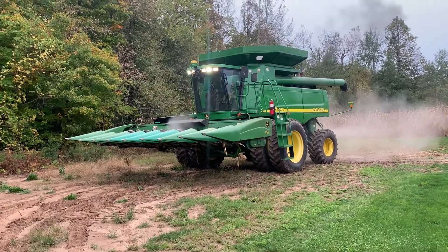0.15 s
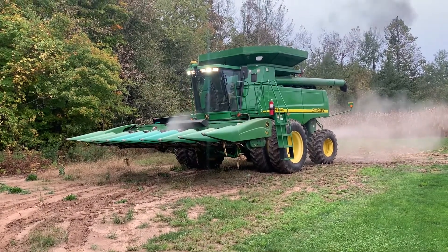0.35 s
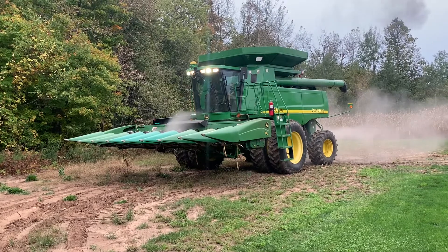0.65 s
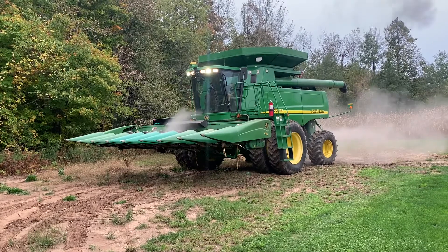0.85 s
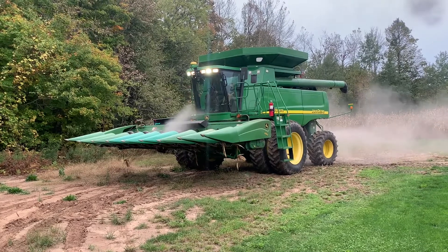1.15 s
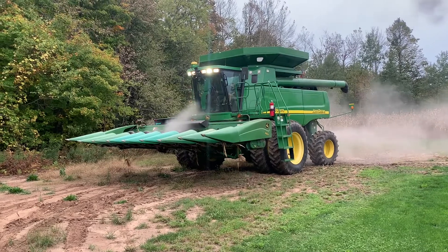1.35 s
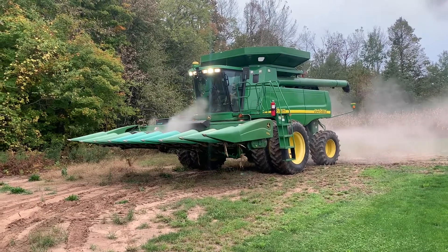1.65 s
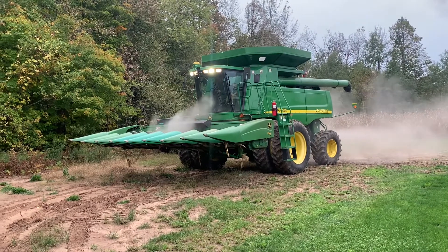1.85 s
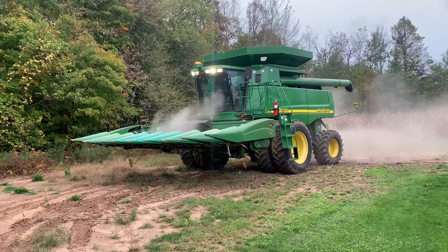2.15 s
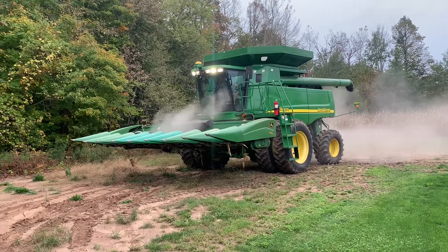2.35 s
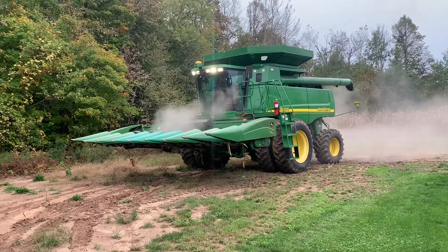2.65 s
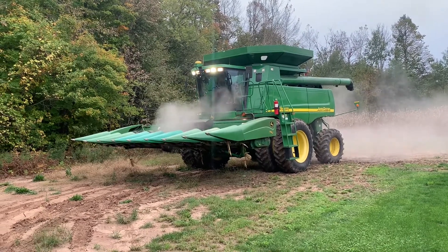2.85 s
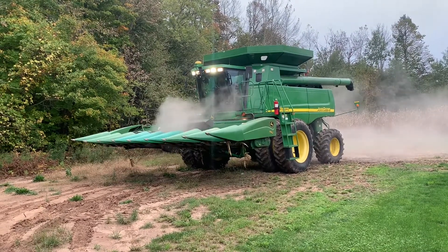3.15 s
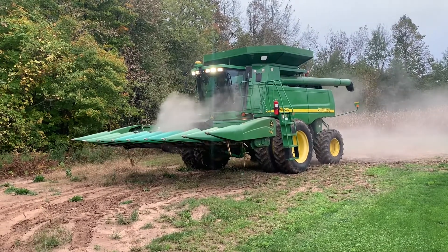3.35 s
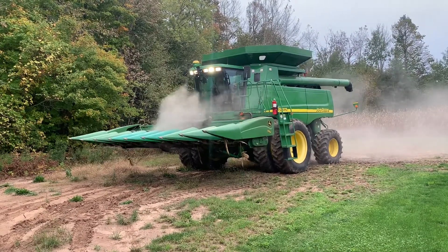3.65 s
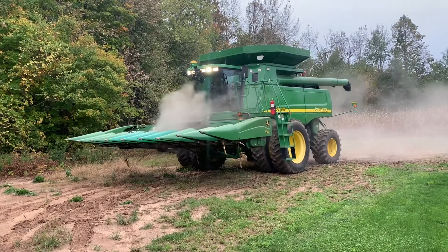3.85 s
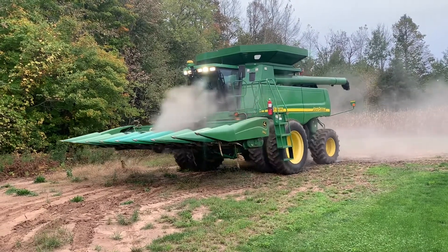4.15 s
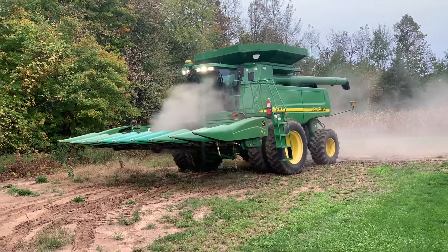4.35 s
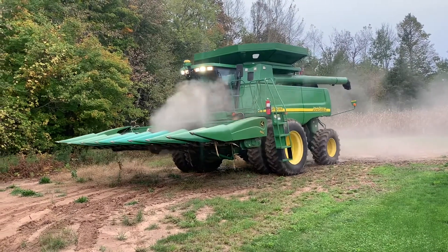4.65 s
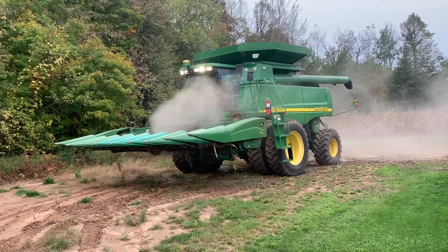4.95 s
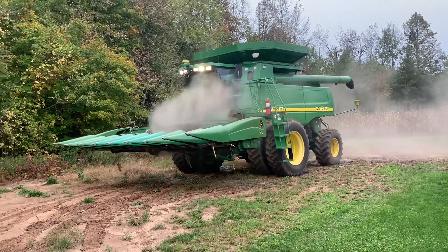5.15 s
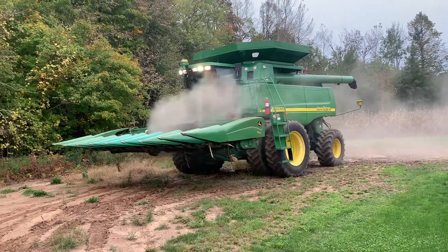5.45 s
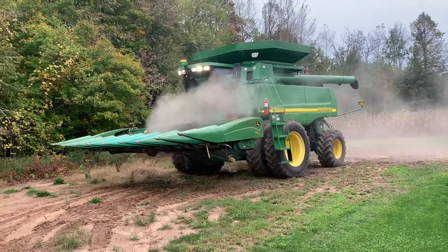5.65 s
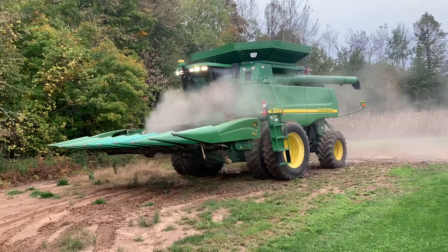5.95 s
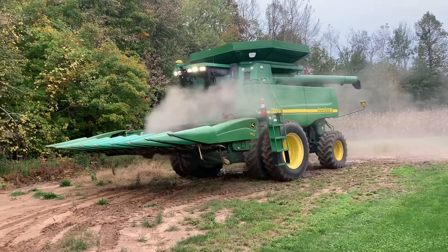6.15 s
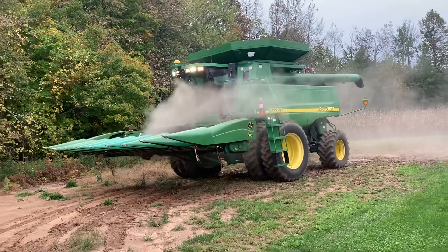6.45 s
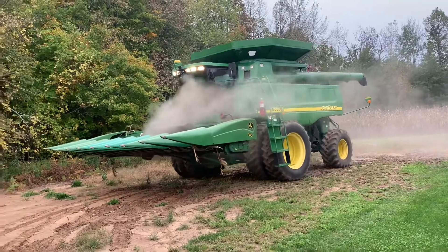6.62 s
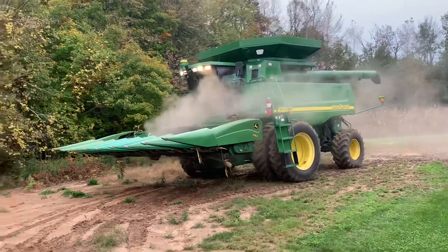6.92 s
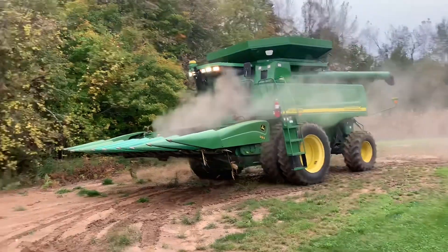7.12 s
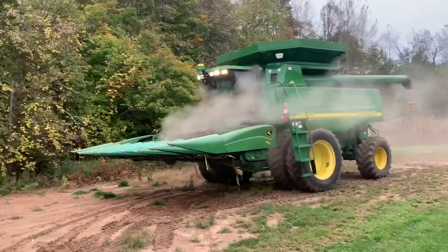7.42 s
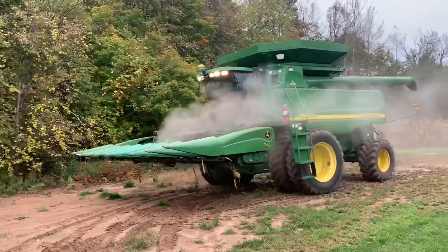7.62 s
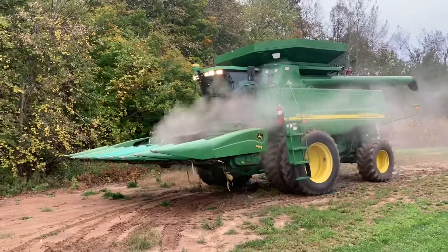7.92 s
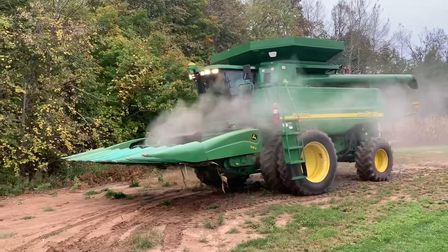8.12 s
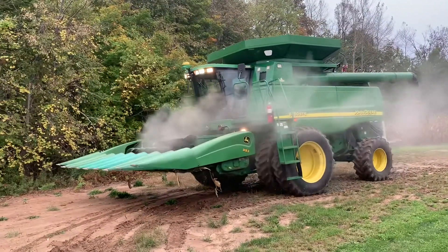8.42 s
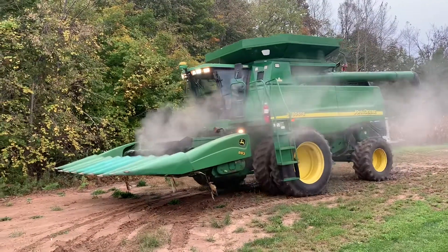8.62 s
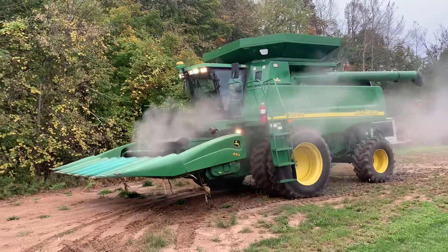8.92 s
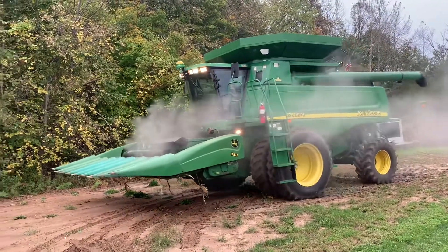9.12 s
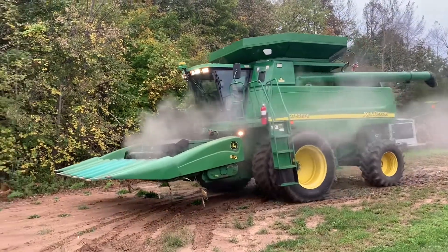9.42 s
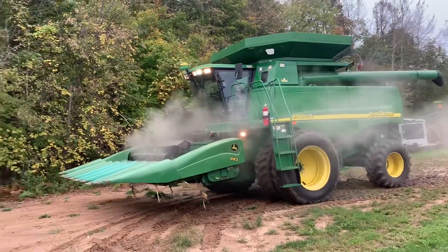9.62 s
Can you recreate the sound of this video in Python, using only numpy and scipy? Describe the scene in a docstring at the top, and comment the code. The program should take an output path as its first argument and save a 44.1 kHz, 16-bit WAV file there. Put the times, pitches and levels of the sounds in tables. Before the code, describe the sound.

A combine harvester's diesel engine hums under roaring fans, a belt squeals briefly, then dry chains hiss and chirp while bearings squeak.

```python
"""A steady diesel hum under a roar of fans: a combine harvester creeps past, its six-cylinder engine
turning a rotor and whining gears while the turbo whistles and loose guards rattle. After a second and
a half the header engages: a slipping belt squeals, the engine sags for a moment, and dry gathering
chains hiss and chirp on sheet steel. Later, dry bearings stick and slip in squeaks and one long squeal."""
import sys
import numpy as np
from scipy import signal
from scipy.fft import rfft, irfft
from scipy.io import wavfile
from scipy.ndimage import uniform_filter1d, map_coordinates

SR = 44100
rng = np.random.default_rng(int(sys.argv[2]) if len(sys.argv) > 2 else 0)


def inscribe(sig):
    """Save sig as 16-bit PCM at rate SR to the path in sys.argv[1].

    A 1-D sig is mono; a 2-D sig holds one channel per row.
    Samples are clipped to [-1, 1] before scaling.
    """
    pcm = np.round(np.clip(np.atleast_2d(sig).T, -1, 1) * 32767)
    wavfile.write(sys.argv[1], SR, pcm.astype(np.int16))


N = 431298
TIME = np.arange(N) / SR

# governed firing rate, sagging as the clutch slips: t/s, f/Hz
FIRING_RATE = [(0, 106.1), (1.15, 105.7), (1.65, 103.8), (2, 105.7), (3.7, 105.2), (5, 105.7), (7.7, 105.7),
               (8.3, 104.7), (9.78, 105.6)]
# octave above the firing note: t/s, level/dB
OCTAVE_ENVELOPE = [(0, -25), (1.7, -26), (4, -28.5), (6, -36), (9.1, -32), (9.7, -25.5)]
# engine shafts, then header shafts: multiple of the firing rate, level/dB
ENGINE_PARTIALS = [(1.52, -34.5), (2.595, -33.5), (5.92, -43), (11.08, -42), (11.92, -42), (13.69, -44.5)]
HEADER_PARTIALS = [(3.02, -35.5), (3.51, -38), (3.73, -39.5)]
# EQ of the body's rumble and of the roar of fans and sieves: f/Hz, relative level/dB
RUMBLE_EQ = [(20, -32), (32, -21), (45, -8.5), (58, -1.5), (90, -0.5), (140, -2), (210, 0), (270, -5.5),
             (350, -6), (400, -6.5), (450, -9.5), (510, -20.5), (800, -63)]
ROAR_EQ = [(350, -29), (510, -4.5), (600, 1.5), (670, -0.5), (800, -2.5), (1080, -3.5), (1300, -1.5),
           (1520, 0), (1720, -4.5), (2250, -6), (2650, -8), (3100, -11), (4700, -14.5), (5600, -20.5),
           (9000, -25), (11000, -68)]
# ground reflections: centre t/s, length/s, delay/ms, drift/(ms/s), gain
GROUND_BOUNCES = [(.2, 2.4, 1.67, -.03, .17), (.7, 2.8, 1.49, 0, .14), (1.65, .8, 2.34, 0, .15),
                  (9, 4, 1.22, 0, .11), (9.4, 1.8, 2.48, .11, .17), (9.4, 2.2, 3.02, .13, .16)]
# rotor overtones: multiple of the rotor rate, level/dB
ROTOR_PARTIALS = [(3, -37), (4, -37), (7, -41)]
# swells of gear whine: centre t/s, length/s, boost/dB, mesh
GEAR_WHINES = [(3.6, 1.05, 13.5, "low"), (4.5, 0.44, 13, "high"), (5.6, 2.2, 6.3, "low"),
               (7.1, .6, 12, "high"), (8.85, .9, 11, "low")]
# turbo whistles: start t/s, length/s, starting f/Hz, fall/(Hz/s), level/dB
TURBO_WHISTLES = [(-.2, 1.8, 2570, 4.7, -31.5), (-.2, 1.4, 3050, 3.2, -40), (-.2, 2.5, 4750, 3, -44),
                  (7.892, 2.1, 2850, 23, -33)]
# modes of the loose steel guards: f/Hz, relative level/dB
GUARD_RESONANCES = [(795, -42), (1300, -37.5), (2450, -40), (2660, -40), (3280, -42.5), (4060, -45.5),
                    (4340, -47.5), (5000, -47)]
# belt squeal as it slips, catches and settles: t/s, f/Hz
BELT_GLIDE = [(1.3, 1410), (1.45, 1455), (1.6, 1485), (1.73, 1570), (1.82, 1480), (1.96, 1440), (2.1, 1390)]
# partials of that squeal: multiple of its pitch, level/dB
BELT_HARMONICS = [(1, -25.5), (2, -41)]
# modes of the belt pulley: f/Hz, level/dB
PULLEY_RESONANCES = [(2050, -44), (2580, -41), (3070, -36.5), (3400, -42)]
# EQ of the gritty hiss: f/Hz, relative level/dB
HISS_EQ = [(3000, -11.5), (5000, -11.5), (6300, -5), (7900, -4), (8080, 6), (8550, 2), (9500, -5.5),
           (11000, -5), (13000, -8.5), (14000, -11), (14600, -33)]
# loud chirps of dry links: t/s, peak level/dB, f/Hz
LINK_CHIRPS = [(1.670, -23, 8050), (1.687, -18.5, 8750), (1.983, -23, 8050), (2.200, -22, 8120),
               (2.382, -22, 8760), (2.743, -25, 8300), (2.898, -17.5, 8440), (3.064, -20, 8130),
               (3.087, -26, 6050), (3.181, -18, 8270), (4.442, -23, 8170), (4.461, -17, 8340),
               (4.806, -18, 8620), (5.043, -24, 9990), (5.843, -18, 8600), (6.189, -19, 8000),
               (6.258, -21, 10160), (7.049, -17, 8650), (7.225, -20, 8780), (7.243, -23, 6120),
               (7.583, -23, 9900), (8.606, -18, 8720), (9.117, -23, 10200)]
# bearing squeaks: centre t/s, length/s, f/Hz, level/dB
BEARING_SQUEAKS = [(3.8, 0.13, 3300, -38), (4.1, 0.22, 2870, -39), (4.25, .4, 3280, -41),
                   (4.59, .07, 2650, -34), (5.947, 1.0, 4720, -43.5), (6.25, .6, 4100, -43),
                   (8.482, 0.2, 2850, -38), (9.024, .07, 2820, -30)]
# long bearing squeal: t/s, f/Hz, level/dB
BEARING_SQUEAL = [(5.1, 2850, -80), (5.33, 2850, -37), (5.5, 2870, -37), (5.8, 2770, -38.5),
                  (6.45, 2715, -36.5), (6.75, 2660, -39), (7.3, 2664, -38), (7.9, 2620, -80)]
# grit striking steel: t/s, peak level/dB, f/Hz
GRIT_TICKS = [(8.402, -16.5, 13000)]
# stereo width of the noise: f/Hz, left-right correlation (0-1)
STEREO_CORRELATION = [(100, .997), (400, .988), (850, .77), (1400, .85), (2200, .66), (4000, .55),
                      (8300, .5), (10000, .93)]
# direction of the engine bay: t/s, left delay/samples
LEFT_DELAY = [(0, .5), (5, .5), (7, 1.1), (8.2, 2), (9.78, 3.4)]
# stereo balance: f/Hz, left minus right level/dB
STEREO_BALANCE = [(300, .2), (500, -1), (850, -8.8), (1150, -3), (2100, -.8), (5500, -2.8), (7700, -1.3),
                  (8200, -6), (9800, 0)]
# stereo phase: f/Hz, left lead/rad
STEREO_PHASE = [(40, -.36), (150, -.28), (750, -.6), (1000, .1), (1500, -.45), (4500, .2), (5300, -1.5),
                (7000, 2.3), (8900, 2.4), (9800, 0), (10600, -.2), (11400, -2.9), (12200, -3.3),
                (13100, -6.2), (14000, -6.4)]

# faders: idle level/dB, boost with the header on/dB, boost at full slip/dB, ramp afterwards/(dB/s)
RUMBLE_FADER, ROAR_FADER = (-20, 1, 1.5, 0), (-24.5, 1.84, 2, .07)
ROTOR_FADER, ROTOR_OCTAVE_FADER = (-35.5, 2, 11, 1.0), (-36.5, 7.5, 6, -.5)
RATTLE_FADER, BELT_FADER = (-8.5, 4, 0, .62), (-38, 7, -11, -.68)
HYDRAULIC_FADER, CHAIN_FADER = (-60, 4.5, 0, .8), (-43, 10, 1.5, .04)

CLUTCH_S, SLIP_LENGTH_S, SPIN_UP_S = 1.68, .62, .42  # the header clutch slips hardest at CLUTCH_S
ROTOR_TURNS_PER_FIRING = .5531


def undb(db):
    """Decibels to gain."""
    return 10 ** (np.asarray(db) / 20)


def unit(x):
    """Scale to an rms of 1."""
    return x / np.sqrt(np.mean(x ** 2))


def curve(rows):
    """Automation lane through (t/s, value) points."""
    return np.interp(TIME, *np.transpose(rows))


def per_bin(points):
    """Curve through (f/Hz, value) points, at every Fourier bin."""
    hz, value = np.transpose(points)
    return np.interp(np.log(np.arange(N // 2 + 1) * SR / N + 1), np.log(hz), value)


def colour(x, eq):
    """Apply an EQ curve and normalise to rms 1."""
    return unit(irfft(rfft(x) * undb(per_bin(eq)), N))


def walk(rate_hz):
    """Random LFO: sample-and-hold, smoothed twice; rms 1."""
    hold = max(int(SR / rate_hz), 2)
    steps = np.repeat(rng.standard_normal(N // hold + 1), hold)[:N]
    return unit(uniform_filter1d(uniform_filter1d(steps, hold), hold))


def swell(centre_s, length_s):
    """Bell-shaped envelope peaking at 1."""
    return np.exp(-(2 * (TIME - centre_s) / length_s) ** 2)


def rise(centre_s, length_s):
    """Smooth fade from 0 to 1."""
    return (1 + np.tanh(2 * (TIME - centre_s) / length_s)) / 2


def slip():
    """How hard the header clutch slips, 0-1."""
    return swell(CLUTCH_S, SLIP_LENGTH_S)


def fader_db(fader, strain, bite_s=.11):
    """A layer's level: up as the clutch bites, shifted by the strain, then ramping as the machine rolls."""
    idle_db, running_db, slip_db, db_per_s = fader
    running = rise(CLUTCH_S - bite_s, SPIN_UP_S)
    return idle_db + running_db * running + slip_db * strain + db_per_s * np.maximum(TIME - CLUTCH_S, 0)


def angle(hz):
    """Running phase of something that turns at hz."""
    return 2 * np.pi * np.cumsum(hz) / SR


def warble(depth, rate_hz, rasp=.006):
    """Phase per Hz of a tone with random vibrato and a fine rasp."""
    return angle(1 + depth * walk(rate_hz) + rasp * walk(400))


def tone(phase, db, waver_db):
    """A sine whose level wavers in the moving air."""
    return np.sqrt(2) * undb(db + waver_db * walk(7)) * np.sin(phase + rng.uniform(0, 2 * np.pi))


def whistle(phase, db, width_hz, flutter_db):
    """A hoarse, fluttering band of noise around a running phase."""
    envelope = undb(db + flutter_db * walk(15))
    return envelope * (walk(width_hz) * np.cos(phase) + walk(width_hz) * np.sin(phase))


def wide_noise():
    """Stereo noise of a large machine: near mono in the bass, wider above."""
    mid, side = rfft(rng.standard_normal((2, N)))
    alike = np.clip(per_bin(STEREO_CORRELATION), 0, 1)
    mid, side = mid * np.sqrt((1 + alike) / 2), side * np.sqrt((1 - alike) / 2)
    return irfft(np.array([mid + side, mid - side]), N)


def delayed(x, delay_s):
    """Stereo delay line with a moving delay time."""
    samples = np.arange(N)
    return np.array([np.interp(samples - SR * delay_s, samples, channel) for channel in x])


def mode_pole(hz, t60_s):
    """Pole of a mode that rings down 60 dB in t60_s."""
    return np.exp((2j * np.pi * hz - np.log(1000) / t60_s) / SR)


def engine(firing):
    """Exhaust pulses hum a muffled note over the tones of the shafts and the rumble of the body."""
    shadow_db = 13.5 * swell(7.2, 2.56)  # the body hides the exhaust as it rolls by
    turn_away_db = .66 * TIME  # the pipe turns away
    note = tone(firing, -17 - shadow_db - 1.5 * slip() - turn_away_db, waver_db=1.1)
    octave = tone(2 * firing, curve(OCTAVE_ENVELOPE), waver_db=0)
    shafts = sum(tone(k * firing, db, waver_db=2) for k, db in ENGINE_PARTIALS)
    header = sum(tone(k * firing, db, waver_db=2) for k, db in HEADER_PARTIALS)
    rumble = colour(wide_noise(), RUMBLE_EQ) * undb(fader_db(RUMBLE_FADER, slip()))
    return note + octave + shafts + rise(CLUTCH_S, SPIN_UP_S) * header + rumble


def clatter(firing, loop_size=2500):
    """Injectors and valves loop the same uneven rattle every six firings."""
    position = firing / (2 * np.pi * 6) * loop_size
    loop = rng.standard_normal(loop_size)
    return unit(map_coordinates(loop, [position % loop_size], order=3, mode="grid-wrap"))


def fans(firing):
    """Air roars through the housing, throbbing with each rotor turn, over the diesel's clatter."""
    turn = ROTOR_TURNS_PER_FIRING * firing
    throb = 1 + .055 * np.cos(turn) + .045 * np.cos(2 * turn)
    air = colour(wide_noise() * throb + .3 * clatter(firing), ROAR_EQ)
    return air * undb(fader_db(ROAR_FADER, slip()) + .68 * walk(20))


def ground(x):
    """Bounces off bare soil come and go, comb-filtering the sound and flanging it as their paths drift."""
    out = x
    for centre_s, length_s, delay_ms, drift_ms_per_s, gain in GROUND_BOUNCES:
        delay_s = (delay_ms + drift_ms_per_s * (TIME - centre_s)) / 1000
        out = out + gain * swell(centre_s, length_s) * delayed(x, delay_s)
    return out


def rotor(firing):
    """The belt-driven rotor hums in step with the crank; its octave swells to a drone in mid approach."""
    turn = ROTOR_TURNS_PER_FIRING * firing
    drone_db = 6 * swell(6.3, 2)
    hum = tone(turn, fader_db(ROTOR_FADER, slip()), waver_db=1.2)
    octave = tone(2 * turn, fader_db(ROTOR_OCTAVE_FADER, slip()) + drone_db, waver_db=3)
    return hum + octave + sum(tone(k * turn, db, waver_db=4.5) for k, db in ROTOR_PARTIALS)


def gears(firing):
    """Two gear meshes, roughened by backlash, sing faintly and swell into passing whines."""
    level_db = {"low": -46.5, "high": -49}
    for centre_s, length_s, boost_db, mesh in GEAR_WHINES:
        level_db[mesh] += boost_db * swell(centre_s, length_s)
    backlash = .5 * walk(30)
    low = tone(9.8 * firing + backlash, level_db["low"], waver_db=2)
    high = tone(25.1 * firing + 2 * backlash, level_db["high"], waver_db=1.5)
    return low + high


def turbo(attack_s=.19, release_s=.49, fade_db_per_s=.5, flutter_db=3.3):
    """Each turbocharger whistle comes up quickly, warbles and flutters, sinks in pitch and fades."""
    out = 0
    for start_s, length_s, hz, fall_hz_per_s, db in TURBO_WHISTLES:
        age = np.clip(TIME - start_s, 0, length_s)
        gate = np.clip(np.minimum(age / attack_s, (length_s - age) / release_s), 0, 1)
        phase = hz * warble(depth=.021, rate_hz=220) - angle(fall_hz_per_s * age)
        out = out + gate * np.sin(phase) * undb(db - fade_db_per_s * age + flutter_db * walk(70))
    return out


def guard_rattle(knocks_per_s=220, spread_db=8, contact_s=.0015):
    """Loose steel guards take a stream of uneven knocks, each a noise burst that rings their modes."""
    knocks = (rng.random(N) < knocks_per_s / SR) * undb(spread_db * rng.random(N))
    bursts = wide_noise() * signal.lfilter([1], [1, -np.exp(-1 / (contact_s * SR))], knocks)
    out = 0
    for hz, db in GUARD_RESONANCES:
        pole = mode_pole(hz, t60_s=.04)
        ring = signal.lfilter([1, 0, -1], np.poly([pole, pole.conjugate()]).real, bursts)
        out = out + unit(ring) * undb(db + walk(9))
    return out * undb(fader_db(RATTLE_FADER, slip()))


def belt(running_hz=1385):
    """The belt sings hoarsely throughout; slipping, it breaks into a rough squeal and rings its pulley."""
    slipping = swell(CLUTCH_S, .6)
    song_phase = angle(running_hz * (1 + .016 * walk(22)))
    song = whistle(song_phase, fader_db(BELT_FADER, slipping), width_hz=150, flutter_db=2)
    squeal_phase = angle(curve(BELT_GLIDE) * (1 + .019 * walk(110)))
    pulley = sum(np.sqrt(2) * undb(db + 2 * walk(25)) * np.sin(hz * warble(depth=.007, rate_hz=90))
                 for hz, db in PULLEY_RESONANCES)
    squeal = sum(tone(k * squeal_phase, db, waver_db=4.5) for k, db in BELT_HARMONICS)
    return song + slipping * (pulley + squeal)


def hydraulics(running_hz=3304, bend_hz=123.6):
    """The hydraulic drive's faint whistle tightens into a clear whine as it spins up the header."""
    strain = swell(CLUTCH_S, .73)
    phase = angle((running_hz + bend_hz * strain) * (1 + .012 * walk(80)))
    breath = whistle(phase, fader_db(HYDRAULIC_FADER, slip()), width_hz=300, flutter_db=5)
    return breath + strain * tone(phase, db=-41, waver_db=1)


def chains(firing):
    """Links scrape a gritty hiss out of the steel, pulsing as six pass per sprocket turn."""
    sprocket = firing / 18.25
    link = 6 * sprocket
    pulse_db = 1.1 * np.cos(link) + .43 * np.cos(link / 2) + .37 * np.cos(sprocket) + .85 * walk(25)
    grit = undb(1.5 * rng.exponential(size=N))
    return colour(wide_noise() * grit, HISS_EQ) * undb(fader_db(CHAIN_FADER, slip()) + pulse_db)


def panel_echoes(x, gain):
    """Early reflections off ground and flat panels; their paths shift as the machine rolls."""
    out = x
    for delay_s in rng.uniform(.003, .014, size=4):
        out = out + gain * delayed(x, delay_s * (1 + .045 * walk(.8)))
    return out


def steel_pings(events, attack_s, t60_s):
    """For each event, a short swell of random kicks rings one steel mode, in stereo."""
    t = np.arange(4096) / SR
    out = np.zeros((2, N + len(t)))
    for start_s, db, hz in events:
        kicks = rng.standard_normal((2, len(t))) * t / attack_s * np.exp(-t / attack_s)
        ring = signal.lfilter([1], [1, -mode_pole(hz, t60_s)], kicks).imag
        at = int(start_s * SR)
        out[:, at:at + len(t)] += undb(db) * ring / np.abs(ring).max()
    return out[:, :N]


def link_chirps(start_s=1.7, faint_count=700):
    """Dry links stick and slip: loud chirps over a dense patter of faint ones."""
    faint = [(start_s + when * (N / SR - start_s), -35 + 8 * force ** 3, 8100 + 2900 * pitch ** 3)
             for when, force, pitch in rng.random((faint_count, 3))]
    return steel_pings(list(LINK_CHIRPS) + faint, attack_s=.004, t60_s=.03)


def bearing_squeaks():
    """Dry bearings stick and slip: wavering, stuttering tones swell and are gone."""
    phase_per_hz = warble(depth=.012, rate_hz=160)
    stutter = undb(2.2 * walk(90))
    squeaks = sum(undb(db) * swell(centre_s, length_s) * np.sin(hz * phase_per_hz)
                  for centre_s, length_s, hz, db in BEARING_SQUEAKS)
    return np.sqrt(2) * stutter * squeaks


def bearing_squeal():
    """A dry bearing squeals on for two seconds, stuttering and sinking in pitch."""
    times, hz, db = np.transpose(BEARING_SQUEAL)
    phase = angle(np.interp(TIME, times, hz) * (1 + .016 * walk(170) + .008 * walk(400)))
    envelope = undb(np.interp(TIME, times, db) + 4.5 * walk(45))
    return np.sqrt(2) * envelope * np.sin(phase)


def grit_tick():
    """A grain of grit hits the steel with one bright, dry tick."""
    return steel_pings(GRIT_TICKS, attack_s=.0005, t60_s=.0015)


def scene():
    """The crankshaft sets the pace; the engine bay drifts to the right while the header stays ahead."""
    firing = angle(curve(FIRING_RATE) * (1 + .001198 * walk(6)))
    bay = engine(firing) + ground(fans(firing)) + rotor(firing) + gears(firing) + turbo()
    bay += guard_rattle() + belt() + hydraulics() + bearing_squeaks() + bearing_squeal()
    bay[0] = map_coordinates(bay[0], [np.arange(N) - curve(LEFT_DELAY)], order=3, mode="nearest")
    header = ground(panel_echoes(chains(firing), gain=.29)) + link_chirps() + grit_tick()
    return bay + header


def record(dry):
    """Left and right each take their own colour and phase; a steep low-pass cuts the top."""
    cutoff_hz = 14600
    contrast = undb(per_bin(STEREO_BALANCE) / 2) * np.exp(.5j * per_bin(STEREO_PHASE))
    stereo = irfft(rfft(dry) * np.array([contrast, 1 / contrast]), N)
    return signal.sosfilt(signal.ellip(10, .2, 80, cutoff_hz, fs=SR, output="sos"), stereo)


dry = scene()
out = record(dry)
inscribe(out)
```